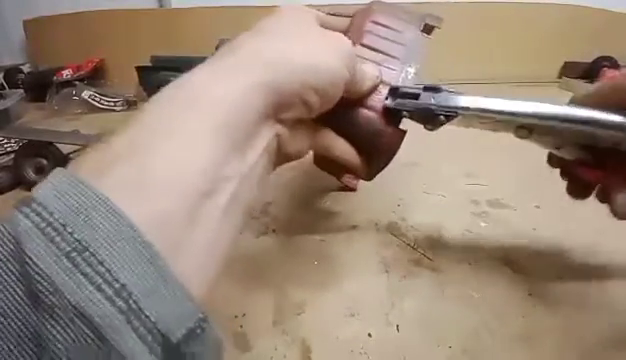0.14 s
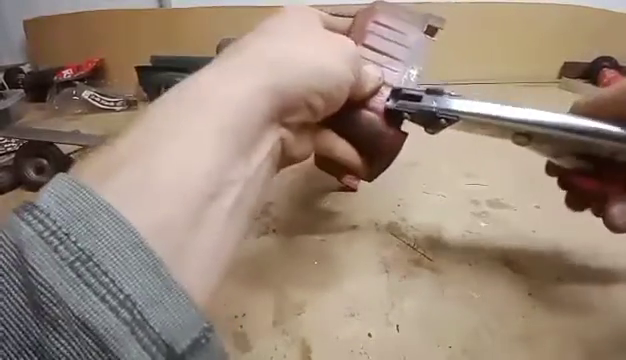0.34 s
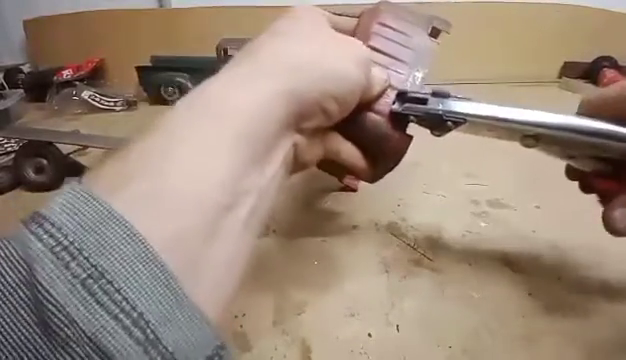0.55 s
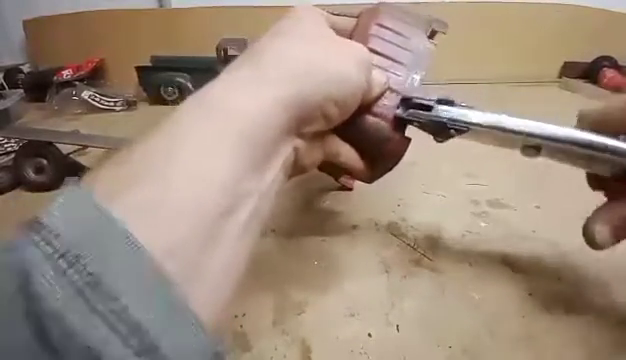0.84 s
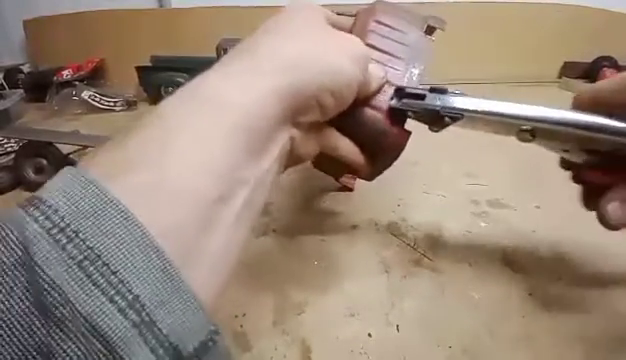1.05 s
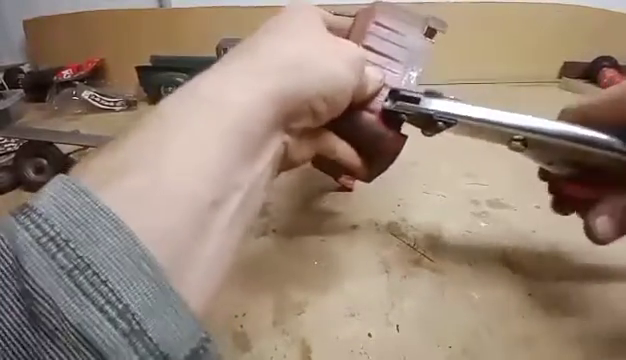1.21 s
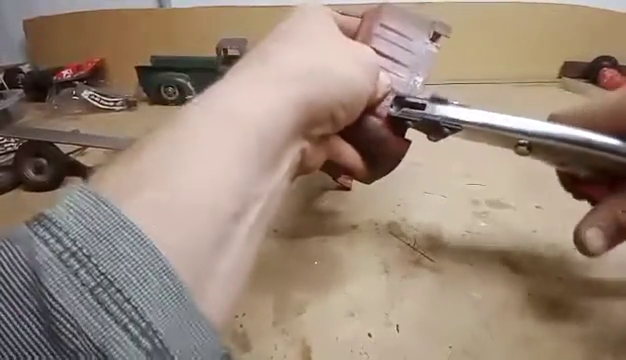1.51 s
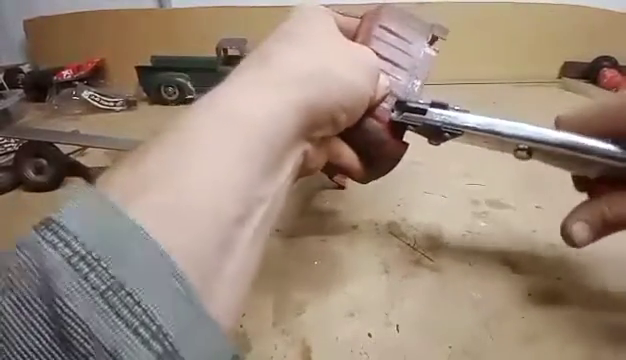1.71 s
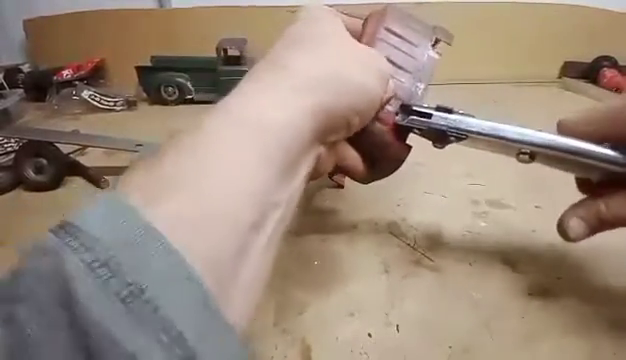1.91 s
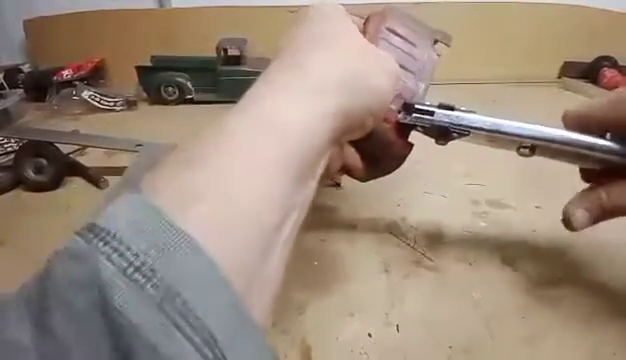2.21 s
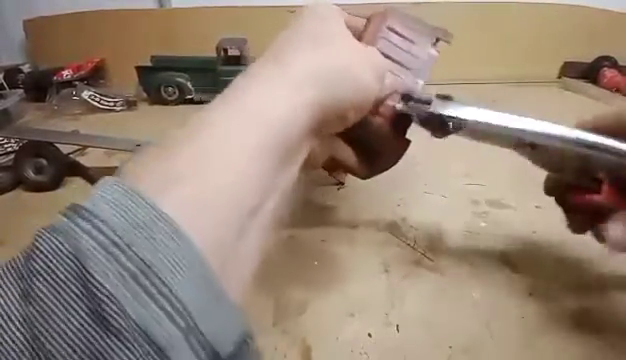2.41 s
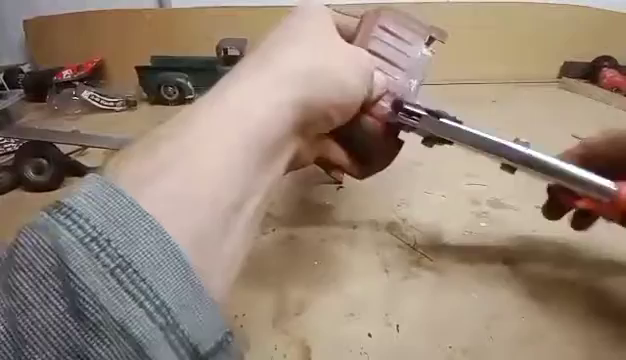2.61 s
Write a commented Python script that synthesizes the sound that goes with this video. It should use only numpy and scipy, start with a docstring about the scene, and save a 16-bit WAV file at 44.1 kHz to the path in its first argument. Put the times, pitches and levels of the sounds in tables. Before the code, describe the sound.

Sharp metallic snips and crunches of hand shears biting thin sheet steel, with dull handling knocks

```python
"""Close to one microphone, hand shears nibble a small pressed-steel part over a wooden bench.
A hard bite and jolt come at 0.15 s, a heavy cluster at 0.81 s, then bites near 1.1, 1.37 and 1.72 s. The
strongest at 2.11 s leads into a swell of rubbing, two more cracks, low thuds and faint last clicks.
Bites are bursts of cracks ringing steel modes, jolts damped sines through hands and bench, rubbing dense
tiny slips; filtered noise and wavering tones make the air and hum of a small lively workshop throughout."""
import sys
import numpy as np
from scipy import signal
from scipy.io import wavfile
from scipy.ndimage import uniform_filter1d, minimum_filter1d

SR = 44100
rng = np.random.default_rng(int(sys.argv[2]) if len(sys.argv) > 2 else 0)


def unload_wav(signal):
    """Save mono or channel-first audio to the path in sys.argv[1] as 16-bit WAV at rate SR, clipped to [-1, 1]."""
    wavfile.write(
        sys.argv[1],
        SR,
        np.round(np.clip(np.atleast_2d(signal).T, -1, 1) * 32767).astype(np.int16),
    )


def decibels_to_gain(level_db):
    """Convert a level in decibels to a linear amplitude gain (20 dB per decade)."""
    exponent = np.asarray(level_db, float) / 20
    return 10 ** exponent


N = 121275  # 2.75 s in samples

# bites and clicks of the jaws:
# (time [s], level [dB], brightness [dB per octave], burst length [s], favoured frequency [Hz])
BITES = [(.1513, -21, -3, 0.0067, 1480), (.4645, -39, -2.5, 0.0065, 5800), (.484, -33.5, -2, 0.0038, 1833),
         (.779, -57, -3, 0.0041, 2250), (.8118, -25, -8.5, 0.0039, 700), (.8147, -25, -3.5, .003, 820),
         (.8172, -26, -2.5, 0.002, 810), (.820, -20, -1, 0.0087, 1140), (.9832, -31, 1, 0.0049, 1950),
         (1.027, -40, -2.5, 0.0043, 4600), (1.038, -45, 0.5, 0.0036, 4800), (1.086, -48, 2.5, 0.0032, 1700),
         (1.0975, -22.5, 0.5, 0.0058, 4310), (1.104, -33, -3.5, 0.006, 2550),
         (1.2045, -43, -3.5, 0.0049, 1950), (1.357, -47.5, -6.5, 0.0031, 4570),
         (1.3686, -28, 0.5, 0.004, 3000), (1.3693, -20.5, -0.5, 0.0052, 2200),
         (1.7205, -28.5, -3.5, 0.013, 755), (1.731, -37.5, -2, 0.0071, 6360),
         (2.1098, -13, 2, 0.0029, 5760), (2.1135, -14.5, 2, 0.0056, 1780), (2.3255, -22, 1, 0.0018, 5900),
         (2.3393, -21, 1.5, 0.0045, 5200), (2.441, -47.5, -3.5, 0.01, 1610), (2.457, -36, -2, 0.0094, 1610),
         (2.4904, -36.5, -1, 0.0031, 1655), (2.6584, -48.5, 0, 0.0096, 3900),
         (2.677, -51, 0.5, 0.0049, 5360), (2.693, -45, -3, 0.0058, 3840)]
# colour of one crack: (frequency [Hz], relative level [dB per Hz])
CRACK_COLOUR = [(180, -24), (300, 4), (700, -9.5), (1300, -4), (1650, 0.5), (2400, 0.5), (3000, -2),
                (4500, -5.5), (6500, -7), (7800, -14.5), (10000, -10), (12800, -20), (14200, -53)]
CRACKS_PER_S, CRACK_SPREAD_DB = 15000, 2
RISE_SHARE = .3  # rise time as a share of burst length
# modes of the steel part and jaws: (frequency [Hz], relative level [dB], t60 [s])
STEEL_MODES = [(715, -9, .07), (905, -13, .06), (1235, -2, .15), (1655, 0, .11), (1770, -6, .08),
               (2140, -5, .09), (2620, -8, .09), (2850, -9, .07), (3880, -6, .11), (4250, -9, .06),
               (4750, -8, .04), (4920, -11, .08), (5520, -10, .05), (6610, -8, .04), (10020, -13, .04)]
MODE_SPREAD_DB, STEEL_RING_DB = 3.5, -5
BITE_FAVOUR_DB, FAVOUR_OCTAVES = 11, .2

# dull jolts through hands and bench: (time [s], level [dB], base pitch [Hz], base t60 [s])
JOLTS = [(.153, -18.5, 328, 0.05), (.164, -20, 140, 0.055), (.175, -28, 70, .15),
         (.813, -29.5, 390.7, 0.17), (.820, -10, 732, 0.017), (.855, -29.5, 69.4, 0.11),
         (.99, -37, 160, 0.1), (1.012, -34, 704, 0.021), (1.036, -33.5, 683, 0.035),
         (1.100, -15.5, 285, 0.043), (1.105, -27, 157, 0.11), (1.368, -25, 790, 0.02),
         (1.372, -29, 175, 0.039), (1.722, -15, 378, 0.025), (1.727, -29, 159.6, 0.13),
         (1.734, -15, 303, 0.027), (2.111, -15, 787, 0.02), (2.17, -31.5, 229.5, 0.27),
         (2.369, -15.5, 243, 0.027), (2.375, -45, 71, 0.43), (2.456, -35, 720, 0.038),
         (2.467, -27, 250, 0.076), (2.496, -23.5, 241, 0.079), (2.505, -32.5, 67, .15)]
# modes of one jolt: (pitch ratio to base [1], relative level [dB])
JOLT_PARTNERS = [(1.0186, -0.5), (.45, -14.5), (1.32, -10.5), (2.42, -10.5)]
JOLT_RISE_CYCLES = 0.26  # time constant of the rise, in cycles of the base pitch

# jaws rubbing the cut edge:
# (time [s], level before touch colour [dB], brightness [dB per octave], favoured frequency [Hz])
RUB_COURSE = [(0, -64.5, -1, 1690), (.07, -64.5, -1.5, 1710), (.09, -71, 1.5, 4700), (.14, -71, 1.5, 4700),
              (0.299, -70, -2, 3890), (0.419, -89, -2.5, 6050), (.5, -62.5, -4.5, 1490),
              (.6, -72.5, 0.5, 1250), (.72, -81.5, -2, 5900), (.79, -73, 7.5, 6040), (.85, -40, -3.5, 1230),
              (.96, -52.5, -3.5, 1200), (1.04, -77, 8, 4700), (1.08, -61.5, -7, 2000),
              (1.2, -65.5, -4.5, 2200), (1.27, -69.5, -1.5, 3030), (1.35, -63.5, 4.5, 4600),
              (1.42, -52, -3, 2340), (1.52, -64.5, -0.5, 2220), (1.6, -59.5, -2, 4470),
              (1.665, -59, 1, 6100), (1.71, -64, 2, 5070), (1.84, -67.5, 0, 4760), (1.94, -65, -1.5, 4900),
              (1.96, -61.5, -1.5, 1670), (1.99, -71.5, -0.5, 1660), (2.04, -63.5, -4.5, 1650),
              (2.104, -70, 2, 1650), (2.118, -44.5, -8, 1700), (2.148, -36, 3.5, 1780),
              (2.215, -31, 1, 1780), (2.24, -37.5, 0.5, 2010), (2.31, -48, 0, 2050),
              (2.322, -44.5, 2, 4000), (2.335, -43.5, 1, 3900), (2.4, -53, -0.5, 2090),
              (2.551, -55.5, 0, 1660), (2.64, -78, 0.5, 1710), (2.7, -63.5, -6, 3900),
              (2.75, -69, -1, 3900)]
# colour of one slip: (frequency [Hz], relative level [dB per Hz])
SLIP_COLOUR = [(180, -40.5), (300, 7), (600, -2), (1100, -14), (1700, -0.5), (2300, 1), (3000, 1),
               (4800, -4), (6600, -2), (7700, -13.5), (10000, -9), (12500, -18), (14000, -53)]
SLIPS_PER_S, SLIP_SPREAD_DB = 7000, 3.3
RUB_RING_DB, RUB_PATCH_DB, RUB_FAVOUR_DB = -5, 2., 9

# hum lines: (frequency [Hz], rms level [dB])
HUM_LINES = [(119.5, -57.5), (240, -58.5), (264, -66), (345, -73.5)]
HUM_POLE_WIDTH_HZ = 8.3  # width of each of the two smoothing poles
# colour of the air noise: (frequency [Hz], relative level [dB])
AIR_COLOUR = [(15, -39.5), (25, 7.5), (116, -6.5), (187, -7.5), (244, -6), (722, -27), (802, -24.5),
              (1160, -25), (1330, -39), (1970, -59), (3180, -64.5), (8470, -44.5), (14000, -58)]
AIR_DB, AIR_PATCH_DB = -54, 2
# decay of the workshop: (frequency [Hz], t60 [s])
ROOM_DECAY = [(100, 0.17), (300, .6), (1000, 0.27), (3000, 0.33), (7000, 0.3), (13000, 0.21)]
ROOM_DB, ROOM_RISE_S = -9.5, 0.0013

SIDE_GAIN_DB, SIDE_FROM_HZ, SIDE_SHARE = 1.5, 4400, .45  # share: chance that a block is wide
MIC_LOW_HZ, MIC_HIGH_HZ = 54.3, 13700


def bite(level_db, tilt_db, length_s, favoured_hz):
    """A quick burst of fractures: each gives a bright crack and rings the steel."""
    t = np.arange(2600) / SR
    length_s = np.clip(length_s, .001, .03)
    rise = np.minimum(t / (RISE_SHARE * length_s), 1)
    fall = np.exp(-(t / length_s) ** 1.3)
    fractures = evened(clicks(CRACKS_PER_S, CRACK_SPREAD_DB, len(t))) * rise * fall
    # every bite drives the modes in its own balance
    balance_db = MODE_SPREAD_DB * rng.standard_normal(len(STEEL_MODES))
    modes = []
    for (hz, mode_db, t60), offset_db in zip(STEEL_MODES, balance_db):
        mode_db = mode_db + offset_db + lean(hz, tilt_db, favoured_hz, BITE_FAVOUR_DB)
        modes.append((hz, mode_db, t60))
    response = decibels_to_gain(STEEL_RING_DB) * ring(modes)
    add(response, 0, colour(CRACK_COLOUR, tilt_db, favoured_hz, BITE_FAVOUR_DB))
    return decibels_to_gain(level_db) * signal.fftconvolve(fractures, response)


def jolt(level_db, base_hz, base_t60):
    """A soft blow rings a few damped modes; the higher ones die sooner."""
    t = np.arange(12000) / SR
    modes = np.zeros(len(t))
    for ratio, mode_db in JOLT_PARTNERS:
        decay = decibels_to_gain(mode_db - 60 * ratio * t / base_t60)
        modes += decay * np.sin(2 * np.pi * base_hz * ratio * t)
    rise = 1 - np.exp(-t * base_hz / JOLT_RISE_CYCLES)
    return decibels_to_gain(level_db) * modes * rise


def rub():
    """Dense tiny slips hiss and sing in the steel, in drifting patches, coloured by where the jaws touch."""
    s, level_db, tilt_db, favoured_hz = np.transpose(RUB_COURSE)
    response = decibels_to_gain(RUB_RING_DB) * ring(STEEL_MODES)
    add(response, 0, colour(SLIP_COLOUR, 0, 1, 0))
    slips = clicks(SLIPS_PER_S, SLIP_SPREAD_DB, N)
    steady = evened(signal.fftconvolve(slips, response)[:N])
    hz, t, z = signal.stft(steady, SR, nperseg=512, noverlap=384)
    patches = rng.standard_normal(z.shape)
    patches = evened(uniform_filter1d(uniform_filter1d(patches, 9, 0), 18, 1))
    tilt_now = np.interp(t, s, tilt_db)
    favoured_now = np.exp(np.interp(t, s, np.log(favoured_hz)))
    touch_db = lean(hz[:, None], tilt_now, favoured_now, RUB_FAVOUR_DB)
    z = z * decibels_to_gain(RUB_PATCH_DB * patches + touch_db)
    rubbing = signal.istft(z, nperseg=512, noverlap=384)[1][:N]
    return decibels_to_gain(np.interp(np.arange(N) / SR, s, level_db)) * rubbing


def hum():
    """Low steady tones, each swelling and fading with slow noise."""
    t = np.arange(N) / SR
    pole = np.exp(-np.pi * HUM_POLE_WIDTH_HZ / SR)
    total = np.zeros(N)
    for hz, level_db in HUM_LINES:
        drift = signal.lfilter([1], [1, -pole], rng.standard_normal(N))
        drift = signal.lfilter([1], [1, -pole], drift)
        waver = 1 + .5 * evened(drift)
        tone = np.sin(2 * np.pi * (hz * t + rng.random()))
        total += decibels_to_gain(level_db) * evened(waver * tone)
    return total


def air():
    """Coloured random noise whose level varies in patches of time and frequency."""
    frames, hz = N // 512 + 5, np.fft.rfftfreq(2048, 1 / SR)
    a, b, patches = rng.standard_normal((3, len(hz), frames))
    patches = evened(uniform_filter1d(uniform_filter1d(patches, 8, 0), 6, 1))
    z = (a + 1j * b) * decibels_to_gain(read(AIR_COLOUR, hz)[:, None] + AIR_PATCH_DB * patches)
    noise = signal.istft(z, nperseg=2048, noverlap=1536)[1][:N]
    return decibels_to_gain(AIR_DB) * evened(noise)


def room_tail():
    """Scattered reflections of random sign, each band dying at its own speed."""
    taps = np.zeros(SR)
    slots = np.arange(0, SR - 20, 20)
    at = slots + rng.integers(0, 20, len(slots))
    taps[at] = rng.choice([-1., 1.], len(at))
    hz, t, z = signal.stft(taps, SR, nperseg=256)
    decay = decibels_to_gain(-60 * t / read(ROOM_DECAY, hz)[:, None])
    tail = signal.istft(z * decay, SR, nperseg=256)[1]
    tail = tail * np.minimum(np.arange(len(tail)) / SR / ROOM_RISE_S, 1)
    return tail / np.linalg.norm(tail)


def treble_width(mid):
    """Left-right noise follows the treble in random blocks, held back where the level jumps."""
    hz, t, z = signal.stft(mid, SR, nperseg=1024, noverlap=768)
    power = uniform_filter1d(abs(z) ** 2, 16, 0)
    # the lowest of three neighbouring frames keeps attacks narrow
    level = np.sqrt(abs(minimum_filter1d(power, 3, 1)))
    a, b = rng.standard_normal((2, len(hz), len(t)))
    blocks = rng.random((len(hz) // 28 + 1, len(t) // 8 + 1)) < SIDE_SHARE
    wide = np.repeat(np.repeat(blocks, 28, 0), 8, 1)[:len(hz), :len(t)]
    wide = wide * (hz > SIDE_FROM_HZ)[:, None]
    side = signal.istft(level * wide * (a + 1j * b), SR, nperseg=1024, noverlap=768)[1][:N]
    return decibels_to_gain(SIDE_GAIN_DB) * side


def clicks(per_s, spread_db, size):
    """Clicks at random moments and of random sign, a few much larger."""
    chance, sign, size_draw = rng.random((3, size))
    present = chance < per_s / SR
    return present * np.sign(sign - .5) * decibels_to_gain(-spread_db * np.log(size_draw + .01))


def ring(modes, size=16000):
    """Struck modes: a sum of dying sines with energy 1."""
    t = np.arange(size) / SR
    x = np.zeros(size)
    for hz, level_db, t60 in modes:
        x += decibels_to_gain(level_db - 60 * t / max(t60, .005)) * np.sin(2 * np.pi * hz * t)
    return x / np.linalg.norm(x)


def colour(points, tilt_db, favoured_hz, favour_db, size=2048):
    """Causal minimum-phase click of energy 1 with the given spectrum, tilted and lifted by lean()."""
    hz = abs(np.fft.fftfreq(size, 1 / SR))
    db = read(points, hz) + lean(hz, tilt_db, favoured_hz, favour_db)
    log_gain = np.log(decibels_to_gain(np.maximum(db, -100)))
    spectrum = np.exp(np.conj(signal.hilbert(log_gain)))
    taps = np.fft.ifft(spectrum).real[:size // 2]
    return taps / np.linalg.norm(taps)


def lean(hz, tilt_db, favoured_hz, favour_db):
    """Level change in dB from a tilt about 3 kHz and a lift around a favoured frequency."""
    hz = np.clip(hz, 300, 14000)
    octaves_off = np.log2(hz / favoured_hz)
    return tilt_db * np.log2(hz / 3000) + favour_db * np.exp(-(octaves_off / FAVOUR_OCTAVES) ** 2)


def read(points, hz):
    """Reads a (frequency, value) table along a logarithmic frequency axis."""
    f, value = np.transpose(points)
    return np.interp(np.log(hz + 1), np.log(f + 1), value)


def evened(x):
    """Scales to an rms of 1."""
    return x / np.sqrt(np.mean(x ** 2) + 1e-20)


def add(mix, s, sound):
    """Adds a sound into the mix at s seconds, cut at the end of the mix."""
    part = mix[round(s * SR):][:len(sound)]
    part += sound[:len(part)]


def scene():
    """Bites and jolts take turns on three room tails, over rubbing, hum and air."""
    hits = np.zeros((3, N))
    for k, (s, *settings) in enumerate(BITES):
        add(hits[k % 3], s, bite(*settings))
    for k, (s, *settings) in enumerate(JOLTS):
        add(hits[k % 3], s, jolt(*settings))
    wet = sum(signal.fftconvolve(x, room_tail())[:N] for x in hits)
    mid = hits.sum(0) + decibels_to_gain(ROOM_DB) * wet + rub() + hum() + air()
    return np.array([mid, mid])


def roll_off(x):
    """The treble ends steeply here."""
    return signal.sosfilt(signal.butter(12, 14240, fs=SR, output="sos"), x)


def record(dry):
    """The close microphone drops deep bass; the treble then gains width and its top is cut."""
    bass_cut = signal.butter(4, MIC_LOW_HZ, "high", fs=SR, output="sos")
    dry = signal.sosfilt(bass_cut, dry)
    side = treble_width(dry[0])
    mix = dry + np.array([side, -side])
    top_cut = signal.firwin(127, MIC_HIGH_HZ, window=("kaiser", 6), fs=SR)
    mix = signal.oaconvolve(mix, top_cut[None], "same")
    return roll_off(mix)


dry = scene()
out = record(dry)
unload_wav(out)
```